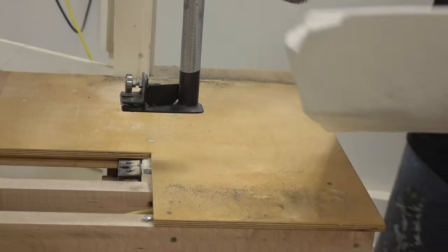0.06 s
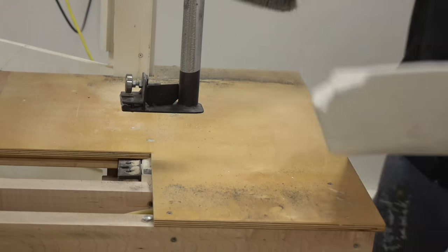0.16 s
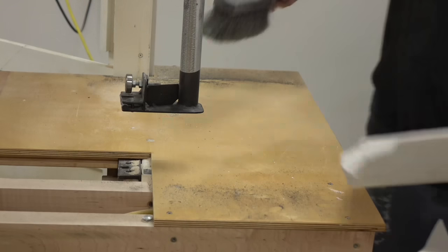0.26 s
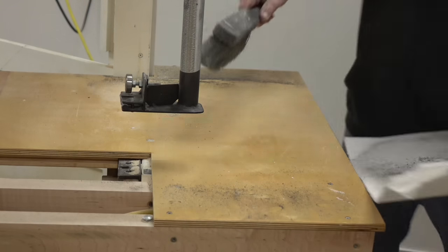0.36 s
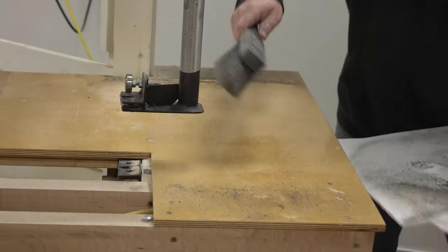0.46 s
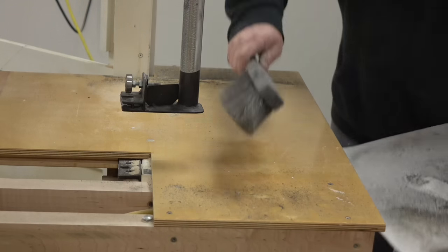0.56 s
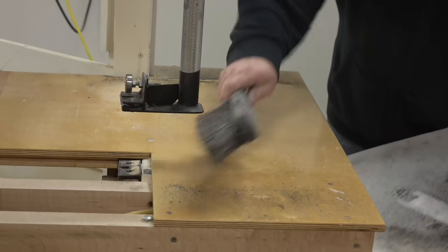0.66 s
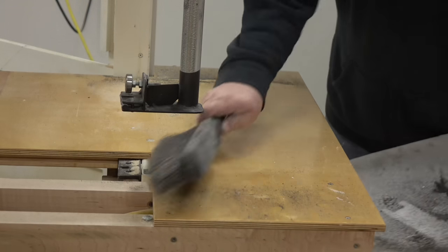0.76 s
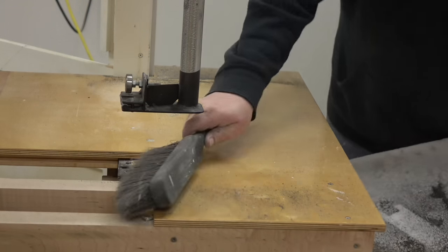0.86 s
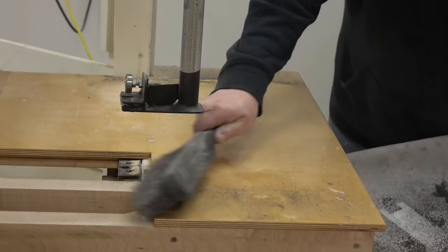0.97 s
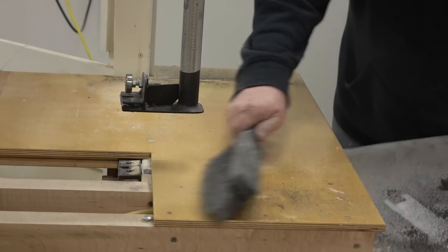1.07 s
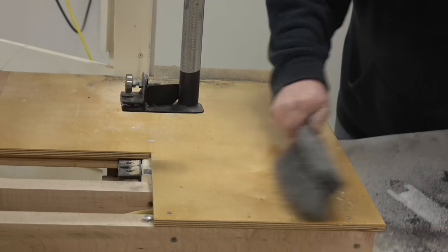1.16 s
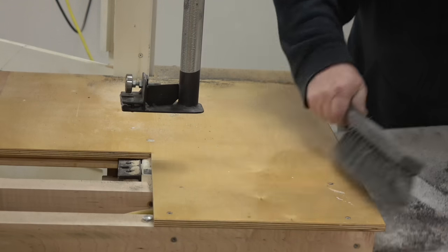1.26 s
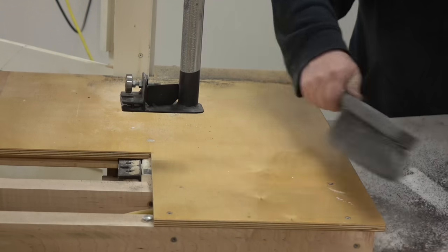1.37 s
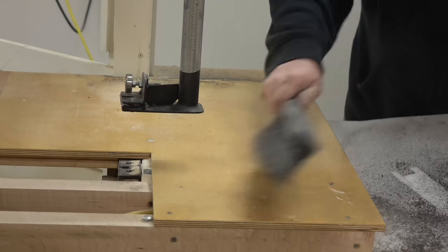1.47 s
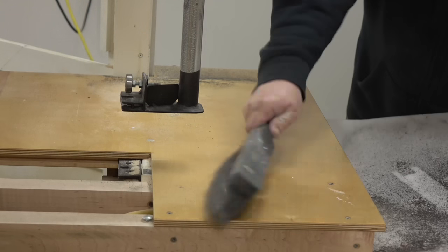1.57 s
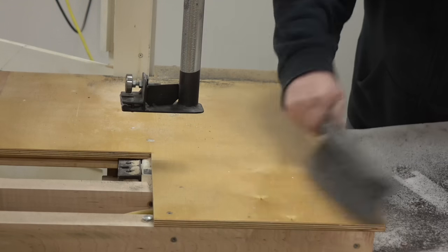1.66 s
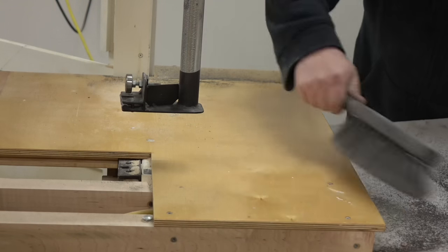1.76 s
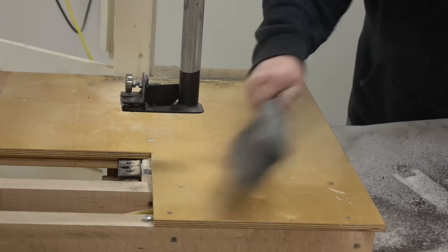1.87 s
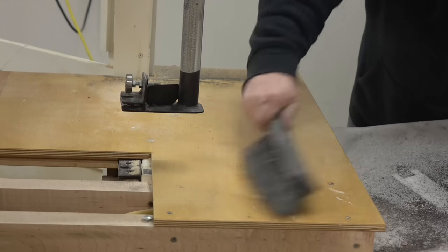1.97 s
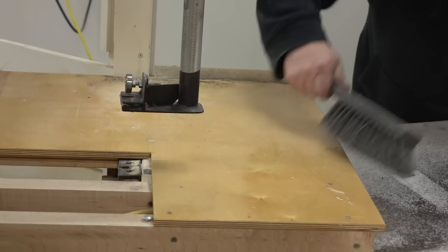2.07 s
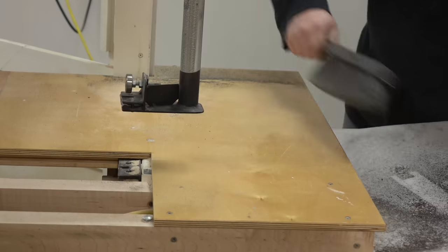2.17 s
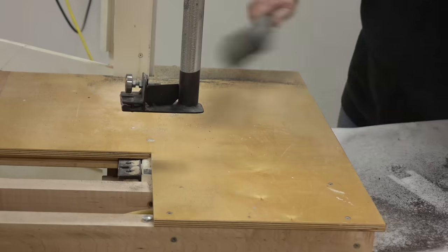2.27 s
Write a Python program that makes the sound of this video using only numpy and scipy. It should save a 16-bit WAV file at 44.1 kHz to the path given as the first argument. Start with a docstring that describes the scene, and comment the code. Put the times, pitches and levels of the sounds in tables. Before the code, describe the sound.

A hand brush sweeps grit off plywood in a small, quiet workshop, close and mono. Light plastic dustpan knocks at 0.25-0.4 seconds lead to a loud rasping scrape near 0.6. Woody thuds at 0.8-0.9 start the hissing bristle strokes, scratchiest around 1.0-1.25. Grit clicks at 1.3-1.65, bristles slap at 1.55 and 1.9, softer strokes follow, and a faint dull swish comes at 2.27.

```python
"""A small workshop, in mono: a plastic dustpan scuffs into place beside a plywood bench,
then a hand brush sweeps dust and grit off the top. Bristles hiss and slap, the brush block bumps the board,
grit rattles along and hits the pan, and the pan gives a last dull swish, over still air and a faint fading whir.
Rubs are coloured noise roughened by tiny slips, knocks and bumps are struck modes,
and low hums are noise ringing in a narrow resonance."""
import sys
import numpy as np
from scipy import signal
from scipy.fft import rfft, irfft, next_fast_len
from scipy.io import wavfile
from scipy.ndimage import uniform_filter1d, map_coordinates

SR = 44100
rng = np.random.default_rng(int(sys.argv[2]) if len(sys.argv) > 2 else 0)


def persist_wave(psi):
    """Save psi, clipped to +-1, as 16-bit WAV."""
    counts = np.round(np.clip(psi, -1, 1) * 32767).astype(np.int16)
    wavfile.write(sys.argv[1], SR, np.atleast_2d(counts).T)


N = 101430  # samples: 2.3 s

# Workshop air. Each row: frequency in Hz, level in dB.
AIR_COLOUR = [(20, 10.5), (60, 1.5), (140, 1.5), (320, -5.5), (600, -11), (1200, -20.5), (3000, -18),
              (6200, -4.5), (8500, -29.5), (14000, -42)]
# Resonances of the faint whir. Each row: centre in Hz, width in Hz, relative level in dB.
WHIR_RESONANCES = [(1590, 110, -1), (2860, 290, 0), (4670, 180, -4)]
AIR_DB, WHIR_START_DB = -66.5, -65.5
WHIR_WAVER_DB, WHIR_FADE_DB_PER_S = 4, 9.5

# The dustpan sliding. Each row: contact in seconds, peak in seconds, level in dB, rise in dB/s, fall in dB/s.
PAN_SLIDES = [(-.1, -.01, -55, 300, 204), (0.224, 0.253, -47, 202, 66), (0.324, 0.369, -42, 289, 205),
              (0.515, 0.598, -28, 199, 188)]
# Rasp of the sliding pan. Each row: frequency in Hz, level in dB.
PAN_COLOUR = [(80, -32), (200, -30), (300, -5), (420, -2), (620, -6), (1300, -2.5), (3500, -7),
              (6200, -5.5), (8000, -13), (11000, -25.5), (15000, -44)]
# Knocks on the pan. Each row: start in seconds, level in dB, 60 dB decay in seconds, attack in seconds.
PAN_KNOCKS = [(.231, -37, 0.099, 0.0029), (1.2965, -41, 0.2, 0.00065), (1.3325, -45.5, 0.25, .0004)]
# Clatter of a knock. Each row: frequency in Hz, level in dB.
KNOCK_COLOUR = [(40, -29), (150, 0), (500, 1), (950, 1), (1600, -9), (4000, -14), (12000, -44)]
# Ringing of the knocked pan. Each row: pitch in Hz, level in dB, 60 dB decay in seconds.
PAN_MODES = [(332.4, -5, 0.11), (458, -0.5, 0.053), (802, -9, 0.23)]
# The pan's thin wall flexing. Each row: peak in seconds, level in dB, rise in dB/s, fall in dB/s.
PAN_FLEXES = [(.249, -48.5, 452, 600), (.302, -45.5, 600, 600), (.366, -42.5, 450, 225)]
# Tone of the flexing wall. Each row: frequency in Hz, level in dB.
FLEX_COLOUR = [(40, -6), (110, -14.5), (150, 0.5), (220, -13), (318, 10), (480, -11), (810, -4),
               (1500, -36)]
# The rim's bright rubs. Each row: peak in seconds, level in dB, rise in dB/s, fall in dB/s.
RIM_RUBS = [(.545, -36.5, 338, 176), (.592, -41.5, 388, 303), (2.272, -56, 147, 210)]
# The pan touching down. One row: start in seconds, level in dB, 60 dB decay in seconds.
PAN_LANDING = (0.509, -42.5, 0.06)
# The pan's hollow driven by the slide. One row: peak in seconds, level in dB, rise in dB/s, fall in dB/s.
HOLLOW_SWELL = (0.55, -35.5, 408, 330)
PAN_GRIP_S = 0.0055  # time constant of catching hold
RIM_HZ, RIM_WIDTH_HZ, RIM_SAG_HZ_PER_S = 6474, 1360, 13000
HOLLOW_HZ, HOLLOW_WIDTH_HZ, HOLLOW_RISE_HZ_PER_S = 790, 242, 3800
GLIDE_S = .06  # a pitch glides this long on either side of its centre

# Pressure of the bristles on the board. Each row: time in seconds, hiss level in dB.
SWEEP = [(.72, -104), (0.746, -48.5), (.79, -47.5), (.86, -47.5), (.93, -53), (.98, -56), (1.021, -46),
         (1.06, -51.5), (1.16, -45), (1.23, -46.5), (1.28, -53), (1.351, -50.5), (1.45, -56), (1.54, -60),
         (1.63, -53.5), (1.714, -49), (1.79, -63.5), (1.91, -77.5), (1.961, -50.5), (2.055, -56.5),
         (2.09, -60.5), (2.15, -69), (2.3, -85)]
# Bristle hiss. Each row: frequency in Hz, level in dB.
BRISTLE_COLOUR = [(750, -44), (1000, -13), (1200, -5.5), (1700, -4), (2500, -3), (4000, -3), (5000, -1),
                  (6200, 1.5), (7300, -2.5), (9000, -9.5), (12000, -15), (15500, -36)]
STRAY_GRAINS_PER_S, STRAY_DB = 86, -16  # level relative to the hiss
# Scratchy rubs: grit pushed along, then a last dull swish of the pan.
# Each row: peak in seconds, level in dB, rise in dB/s, fall in dB/s.
SCRATCHES = [(.752, -49.5, 697, 187), (1.02, -49.5, 496, 506), (1.145, -43, 220, 144),
             (1.2, -46.5, 298, 139), (2.272, -57.5, 180, 311)]
# Tone of the scratchy rubs. Each row: frequency in Hz, level in dB.
SCRATCH_COLOUR = [(80, -39), (400, 0), (600, -14.5), (790, 3), (1000, 1.5), (1500, 4.5), (2600, -7.5),
                  (5000, -1), (9000, -15), (15000, -103)]

# The brush block bumping the board. Each row: start in seconds, level in dB, decay time scale,
# tilt in dB per octave above the lowest mode.
BUMPS = [(0.797, -22.5, 0.27, -33), (.842, -27.5, 0.47, 0), (.889, -34, 0.55, -1), (1.299, -45, 1, 1),
         (1.333, -52.5, 1.64, 3)]
# Ringing of the plywood. Each row: pitch in Hz, level in dB, 60 dB decay in seconds before scaling.
BOARD_MODES = [(75.4, -13.5, 0.32), (100.5, -6, 0.16), (147.8, 3.5, 0.14), (195, 1.5, 0.081),
               (305, -3.5, 0.19), (390.4, -15, 0.31)]
# The board shuddering under the brush. Each row: peak in seconds, level in dB, rise in dB/s, fall in dB/s.
SHUDDERS = [(.76, -52.5, 489, 79), (.905, -43.5, 213, 151), (1.335, -60, 395, 94), (1.59, -61, 400, 97)]
# Tone of the shudder. Each row: frequency in Hz, level in dB.
SHUDDER_COLOUR = [(25, -17), (55, 5), (90, 5.5), (150, 3.5), (250, -1.5), (330, -2.5), (450, -16.5),
                  (900, -65)]

# Low hums, probably the pan's wall resonating. Each row: peak in seconds, level in dB, rise in dB/s, fall in dB/s.
LOW_HUMS = [(1.022, -51.5, 446, 400), (1.09, -52.5, 452, 400), (1.18, -55.5, 147, 200),
            (1.285, -47.5, 400, 300), (2.274, -56, 600, 453)]
HUM_HZ, HUM_WIDTH_HZ = 312, 39

# Single hard grains. Each row: start in seconds, level in dB, pitch in Hz.
TICKS = [(1.297, -31, 1500), (1.333, -26, 2100), (1.4772, -33.5, 3300), (1.6366, -30, 4340),
         (1.728, -42, 2600), (1.839, -40, 3200)]
TICK_CYCLES = 5  # cycles for a click to fall 60 dB

# Bristles slapping down or springing off the edge. Each row: start in seconds, level in dB, 60 dB decay in seconds.
SLAPS = [(1.548, -41.5, 0.32), (1.92, -39.5, 0.16)]
# Spray of a slap, also the tone of stray grains. Each row: frequency in Hz, level in dB.
SLAP_COLOUR = [(200, -10.5), (1050, -23), (1400, -11.5), (2400, -1), (3000, -4), (4000, 1), (6200, 0.5),
               (8000, -10.5), (11000, -22), (15500, -34)]
# Ringing of slapped bristles. Each row: pitch in Hz, level in dB, 60 dB decay in seconds.
BRISTLE_MODES = [(1171, -5, 0.11), (1249, -7.5, 0.17)]

SLIPS_PER_S, CLUMPS_PER_S = 5000, 90
PATCH_DB = 2  # rms shift of a rub's colour from moment to moment
ROOM_T60_S, ROOM_DB = 0.17, -10
LOW_CUT_HZ, TOP_HZ = 57, 15650


def amp(db):
    """Decibels to gain."""
    return 10 ** (np.asarray(db) / 20)


def unit(x):
    """Scaled to rms 1."""
    return x / np.sqrt(np.mean(x ** 2) + 1e-20)


def clock():
    """Seconds at each sample."""
    return np.arange(N) / SR


def filtered(x, response):
    """x times a response of frequency."""
    padded = next_fast_len(N + SR // 2)
    spectrum = rfft(x, padded)
    return irfft(spectrum * response(np.fft.rfftfreq(padded, 1 / SR)), padded)[:N]


def coloured(x, points):
    """x through a (Hz, dB) colour drawn over log frequency, at rms 1."""
    f, db = np.transpose(points)
    return unit(filtered(x, lambda hz: amp(np.interp(np.log(hz + 1), np.log(f + 1), db))))


def noise(points):
    """Smooth coloured noise."""
    return coloured(rng.standard_normal(N), points)


def wobble(rate):
    """A smooth random curve, rate knots a second."""
    knots = clock() * rate
    return map_coordinates(rng.standard_normal(int(knots[-1]) + 4), [knots])


def patchy(x):
    """x with brief, narrow patches of random gain."""
    spectrogram = signal.stft(x, nperseg=512)[2]
    field = rng.standard_normal(spectrogram.shape)
    field = uniform_filter1d(field, size=3, axis=0)  # across frequency
    field = uniform_filter1d(field, size=5, axis=1)  # across time
    return signal.istft(spectrogram * amp(PATCH_DB * unit(field)), nperseg=512)[1][:N]


def friction(points, grain_db, flutter_db):
    """Tiny uneven slips over a smooth rub, roughened by random clumping and brief random shifts of colour."""
    sizes = amp(3 * np.minimum(rng.exponential(size=N), 3))
    slips = (rng.random(N) < SLIPS_PER_S / SR) * rng.choice([-1, 1], N) * sizes
    rub = rng.standard_normal(N) + amp(grain_db) * unit(slips)
    clumping = amp(flutter_db * wobble(CLUMPS_PER_S))
    return unit(coloured(patchy(rub), points) * clumping)


def swell(s, db, rise, fall):
    """A level that climbs to a peak at time s and falls away."""
    t = clock() - s
    return amp(db + np.minimum(rise * t, -fall * t))


def swells(rows):
    """Several swells, added in power."""
    return np.sqrt(sum(swell(*row) ** 2 for row in rows))


def blow(s, db, t60, attack_s):
    """A quick rise and an exponential decay."""
    t = np.maximum(clock() - s, 0)
    return amp(db - 60 * t / t60) * (1 - np.exp(-t / attack_s))


def ring(s, db, modes, attack_s, length=1, tilt_db=0):
    """Modes struck at time s, tilted per octave above the first, each a little uneven in level."""
    total = 0
    for hz, level, t60 in modes:
        tilt = tilt_db * np.log2(hz / modes[0][0])
        envelope = blow(s, db + level + tilt + rng.normal(0, 1), t60 * length, attack_s)
        total = total + envelope * np.sin(2 * np.pi * hz * (clock() - s))
    return total


def glide(s, hz, hz_per_s):
    """A pitch that slides through hz at time s and rests on either side."""
    return hz + hz_per_s * np.clip(clock() - s, -GLIDE_S, GLIDE_S)


def resonance(hz, width_hz):
    """Noise ringing around a steady or gliding pitch, half amplitude width_hz away, at rms 1."""
    phase = 2 * np.pi * np.cumsum(hz * np.ones(N)) / SR
    drift = lambda: filtered(rng.standard_normal(N), lambda f: 1 / (1 + (f / width_hz) ** 4))
    return unit(drift() * np.cos(phase) + drift() * np.sin(phase))


def background():
    """Still workshop air as coloured noise, and a faint whir of wavering resonances that dies away."""
    whir = sum(amp(db + WHIR_WAVER_DB * wobble(40)) * resonance(hz, width)
               for hz, width, db in WHIR_RESONANCES)
    fade = amp(WHIR_START_DB - WHIR_FADE_DB_PER_S * clock())
    return amp(AIR_DB) * noise(AIR_COLOUR) + fade * unit(whir)


def grip(s):
    """The pan catching hold around time s, a smooth step from 0 to 1."""
    return (1 + np.tanh((clock() - s) / PAN_GRIP_S)) / 2


def pan_rasp():
    """The pan catches and slides, its friction rasping on each push."""
    slide = np.sqrt(sum((swell(*shape) * grip(start)) ** 2 for start, *shape in PAN_SLIDES))
    return slide * friction(PAN_COLOUR, grain_db=-1.0, flutter_db=1.5)


def pan_knocks():
    """Each knock makes the pan clatter with noise and ring in its modes."""
    clatter = noise(KNOCK_COLOUR)
    return sum(clatter * blow(s, db, t60, attack) + ring(s, db, PAN_MODES, attack)
               for s, db, t60, attack in PAN_KNOCKS)


def pan_flexes():
    """The thin wall flexes in low swells of noise."""
    return swells(PAN_FLEXES) * noise(FLEX_COLOUR)


def pan_hollow():
    """The landing and slide drive the pan's hollow, which climbs in pitch as the pan closes on the bench."""
    drive = blow(*PAN_LANDING, attack_s=0.0015) + swell(*HOLLOW_SWELL) * grip(PAN_LANDING[0])
    pitch = glide(HOLLOW_SWELL[0], HOLLOW_HZ, HOLLOW_RISE_HZ_PER_S)
    return drive * resonance(pitch, HOLLOW_WIDTH_HZ)


def pan_rim():
    """Bright resonant rubs of the rim, each sinking in pitch as it passes."""
    rubs = sum(swell(*row) * resonance(glide(row[0], RIM_HZ, -RIM_SAG_HZ_PER_S), RIM_WIDTH_HZ)
               for row in RIM_RUBS)
    return rubs * grip(PAN_LANDING[0] + 2 * PAN_GRIP_S)


def dustpan():
    """The plastic pan's rasp, knocks, flexing wall, hollow and rim together."""
    return pan_rasp() + pan_knocks() + pan_flexes() + pan_hollow() + pan_rim()


def sweeping():
    """Bristles hiss with pressure and flick stray grains."""
    pressure = amp(np.interp(clock(), *np.transpose(SWEEP)))
    hiss = friction(BRISTLE_COLOUR, grain_db=2.5, flutter_db=1.16)
    flicks = (rng.random(N) < STRAY_GRAINS_PER_S / SR) * rng.standard_normal(N)
    strays = coloured(flicks, SLAP_COLOUR)
    return pressure * (hiss + amp(STRAY_DB) * strays)


def scratches():
    """Rubs lower-pitched and smoother than the hiss: heaps of grit pushed along, then the pan's last swish."""
    return swells(SCRATCHES) * friction(SCRATCH_COLOUR, grain_db=-3.5, flutter_db=0.4)


def board():
    """The plywood thuds in its modes under the block, and shudders in low noise as it drags."""
    thuds = sum(ring(s, db, BOARD_MODES, attack_s=0.0028, length=length, tilt_db=tilt)
                for s, db, length, tilt in BUMPS)
    return thuds + swells(SHUDDERS) * noise(SHUDDER_COLOUR)


def low_hums():
    """Noise swells in one narrow low resonance, probably the pan's wall."""
    return swells(LOW_HUMS) * resonance(HUM_HZ, HUM_WIDTH_HZ)


def ticks():
    """Hard grains click one by one, each a few sharp cycles at its own pitch."""
    return sum(blow(s, db, TICK_CYCLES / hz, attack_s=1 / SR) * np.sin(2 * np.pi * hz * (clock() - s))
               for s, db, hz in TICKS)


def slaps():
    """The tufts land together in a short spray and ring briefly."""
    spray = friction(SLAP_COLOUR, grain_db=-3.5, flutter_db=4.0)
    return sum(spray * blow(s, db, t60, attack_s=0.00089) + ring(s, db, BRISTLE_MODES, attack_s=0.004)
               for s, db, t60 in SLAPS)


def room(x):
    """The short tail of the workshop, a decaying burst of noise convolved with the sound."""
    decay = blow(0.0057, 0, ROOM_T60_S, attack_s=0.00022)
    tail = (decay * rng.standard_normal(N))[:SR // 2]
    return signal.fftconvolve(x, tail / np.linalg.norm(tail))[:N]


def scene():
    """Everything at the bench with its room tail and background, the same in both ears."""
    near = dustpan() + sweeping() + scratches() + board() + low_hums() + ticks() + slaps()
    mono = near + amp(ROOM_DB) * room(near) + background()
    return np.array([mono, mono])


def record(dry):
    """The microphone sheds the deepest bass; nothing passes above the band limit."""
    low_cut = signal.butter(2, LOW_CUT_HZ, "high", fs=SR, output="sos")
    thinned = signal.sosfilt(low_cut, dry)
    return np.array([filtered(channel, lambda hz: hz < TOP_HZ) for channel in thinned])


dry = scene()
out = record(dry)
persist_wave(out)
```